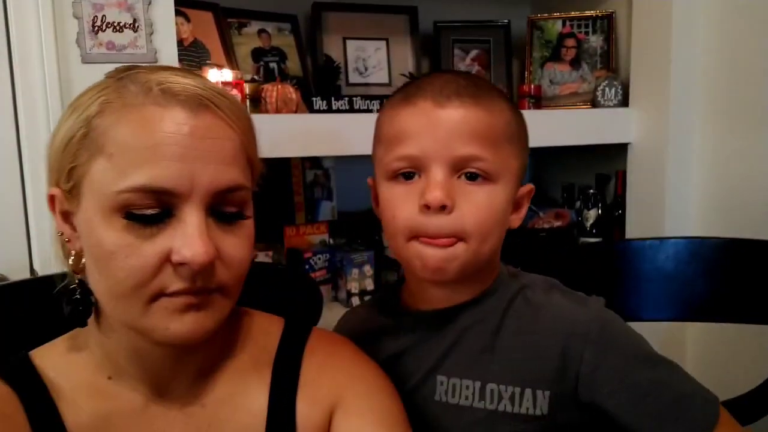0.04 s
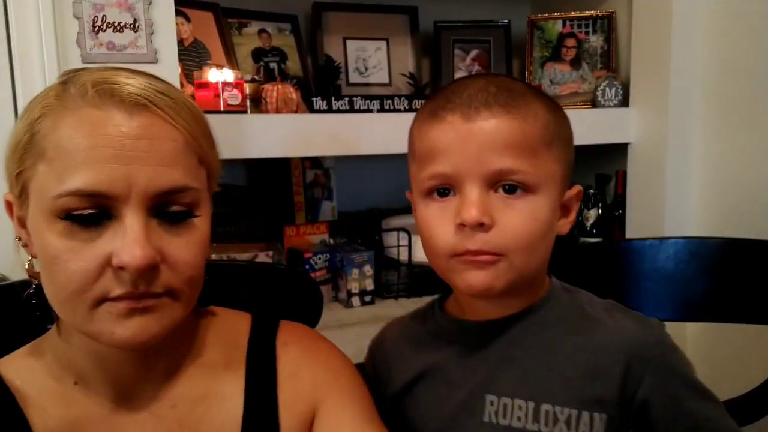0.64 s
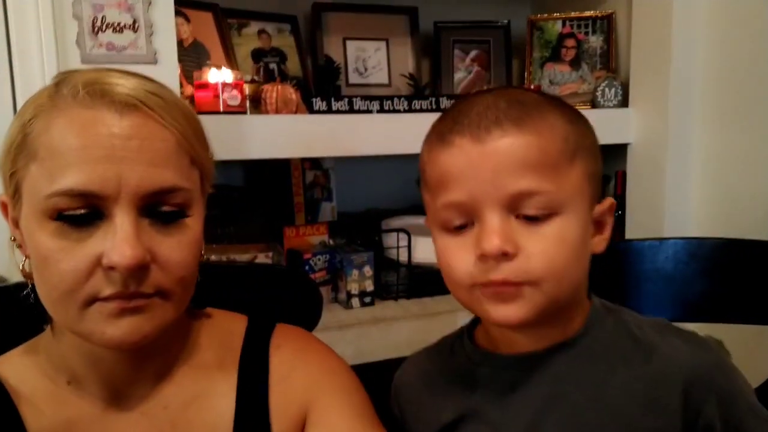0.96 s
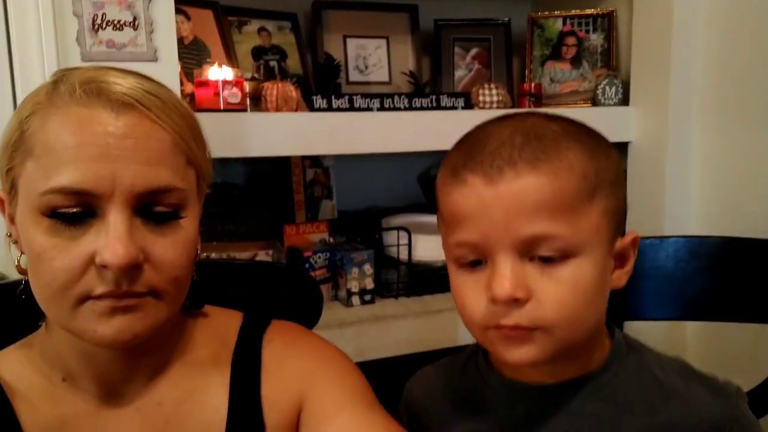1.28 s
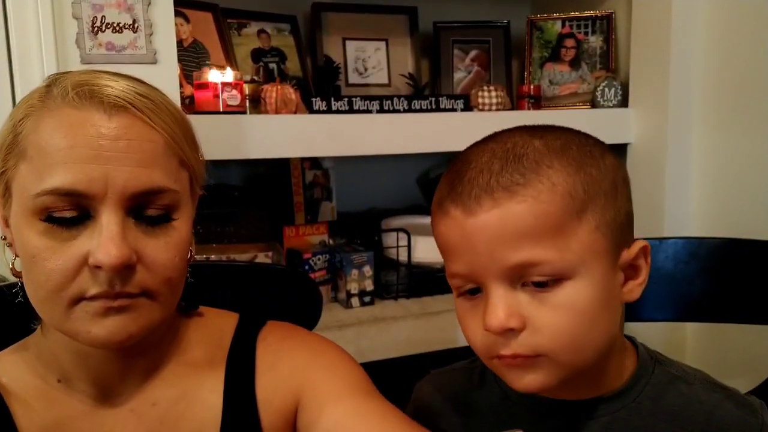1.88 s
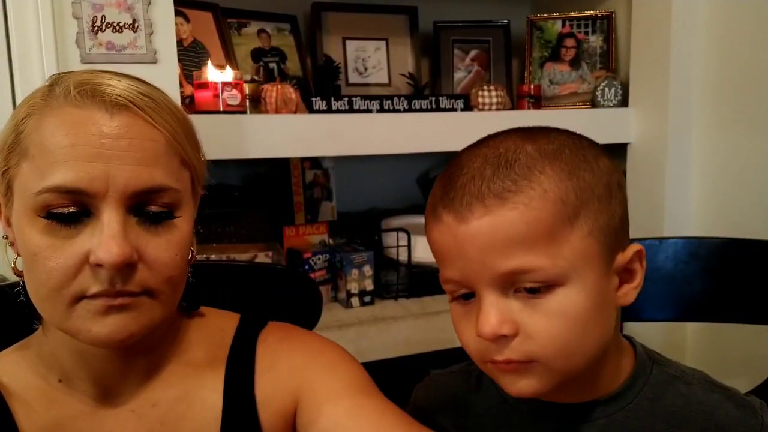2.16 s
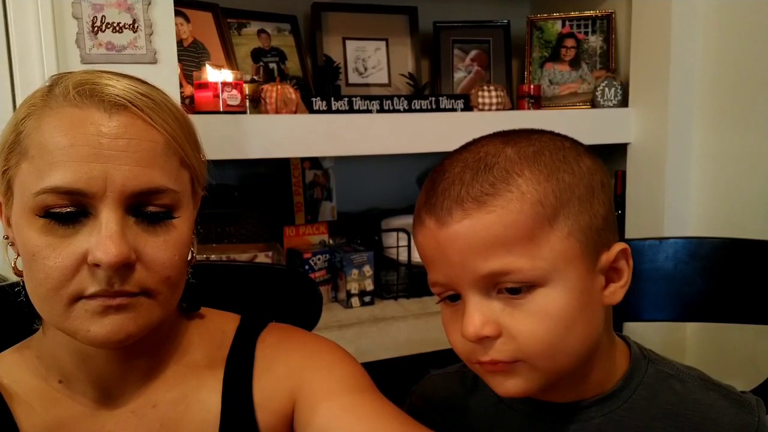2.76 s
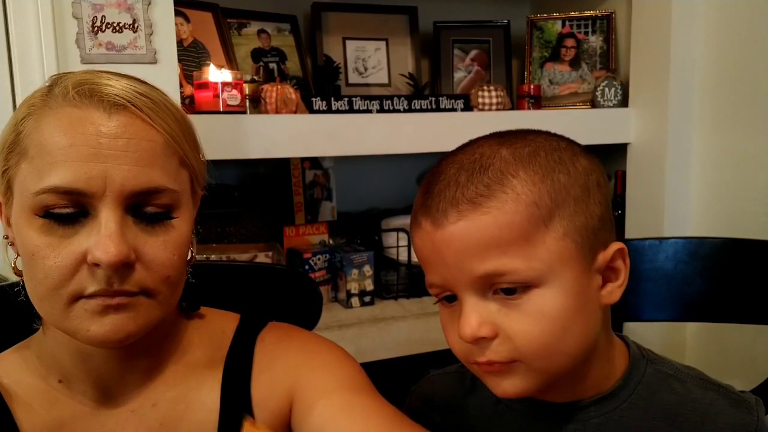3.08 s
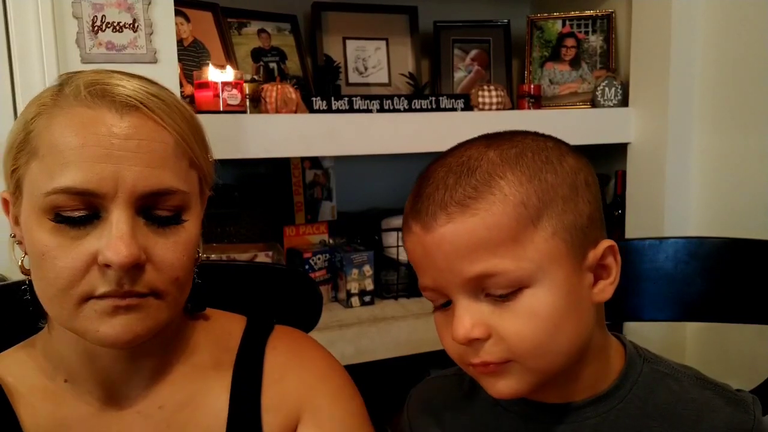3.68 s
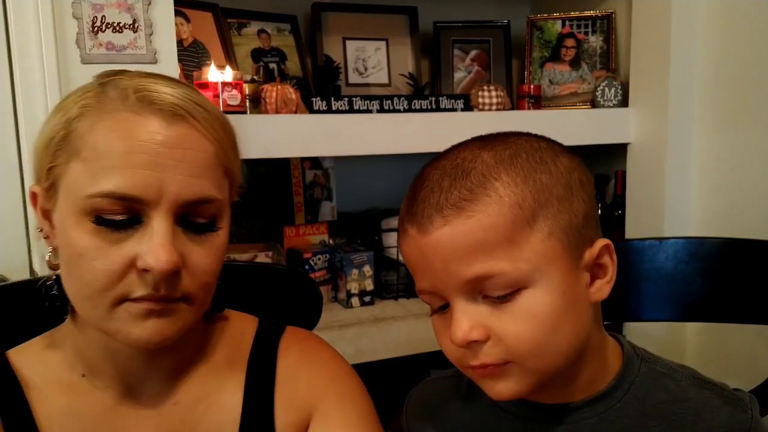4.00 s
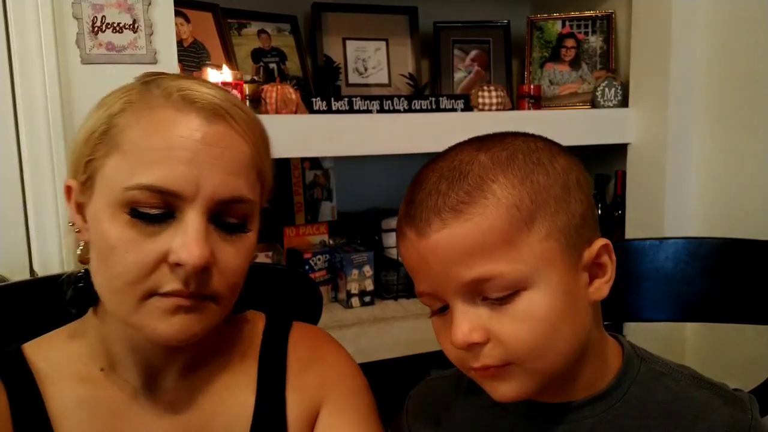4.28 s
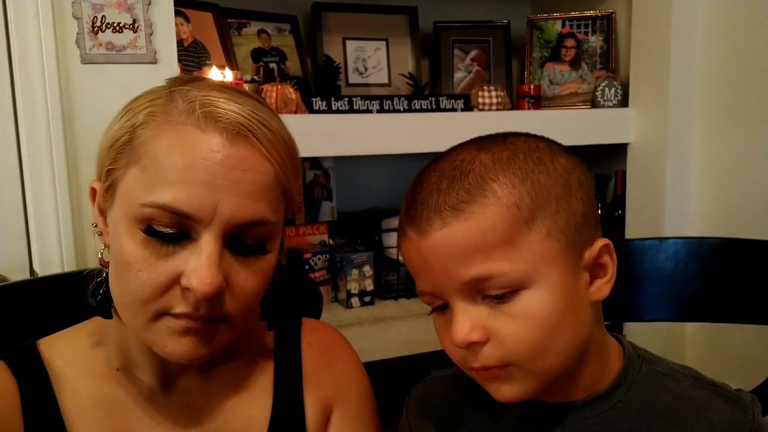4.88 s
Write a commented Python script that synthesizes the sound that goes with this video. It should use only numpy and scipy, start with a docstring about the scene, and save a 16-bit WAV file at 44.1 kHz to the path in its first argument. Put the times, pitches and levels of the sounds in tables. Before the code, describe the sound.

A thin plastic snack bag crinkles and snaps irregularly in a quiet room, and near the end something knocks down onto a table.

```python
"""Living room: a thin plastic snack bag is handled. Creases buckle and snap one by one, the film
resettles after each, and squeezes crush small wrinkles and ring the bag's panels. Near the end an
object is set on a table with a few knocks, a scrape and light taps, and the bag gives its loudest
crack. The room answers briefly; an appliance hums faintly."""
import sys
import numpy as np
from scipy import signal
from scipy.fft import rfft, irfft, next_fast_len
from scipy.io import wavfile
from scipy.ndimage import uniform_filter1d, map_coordinates

SR = 44100
rng = np.random.default_rng(int(sys.argv[2]) if len(sys.argv) > 2 else 0)


def file_out(sig):
    """Save sig as 16-bit WAV at sys.argv[1]."""
    # one column per channel
    cols = np.atleast_2d(sig).T
    # limit, then scale
    lim = np.clip(cols, -1, 1)
    pcm = np.round(lim * 32767).astype(np.int16)
    wavfile.write(sys.argv[1], SR, pcm)


N = 222308
BAND_LIMIT_HZ = 7950

# Large creases: t/s, level/dB, mid/dB, low/dB, resettling/dB (last three re level)
CREASE_SNAPS = [(0.0173, -31, -2.5, -19, -24), (0.1006, -25, -19, -23, -13), (0.117, -33.5, -4, -3.5, -17),
                (0.1351, -24.5, -9, -8.5, -20.5), (0.142, -29.5, -4, -5, -16), (0.161, -34, -11, -7, -14),
                (0.3683, -25, 6, -8, -19), (0.376, -29, 0, -13, -18), (0.4399, -34, -16, -36, -12),
                (0.4805, -40.5, -7, -10.5, -11.5), (0.5664, -35, -25, -17, -12),
                (0.6481, -35, -11, -7.5, -20.5), (0.6971, -31, -6.5, -11, -17),
                (0.7819, -37.5, -8, -23, -11), (0.8995, -34.5, -27, -15.5, -9.5),
                (1.035, -39.5, -3, 0, -15.5), (1.156, -41.5, -2, -18, -15), (1.1707, -32.5, -14, -13, -16),
                (1.3113, -45.5, -30, -16, -12), (1.3715, -37, -9.5, -16, -15),
                (1.544, -46.5, -5.5, -7, -24), (1.6653, -31, -12.5, -20, -15),
                (1.7401, -34, -26, -17, -13.5), (1.7734, -36.5, -30, -11, -15),
                (1.8509, -28, -12, -27, -24), (1.947, -35.5, -11, -21.5, -13),
                (2.0009, -31, -15, -12.5, -18.5), (2.0969, -34.5, 0, -3, -22.5),
                (2.1683, -27.5, -20.5, -27, -17), (2.2587, -33, -13.5, -9.5, -23),
                (2.283, -38, -6, -16.5, -20.5), (2.2974, -37, -18, -19, -16.5),
                (2.3137, -34, -18, -21, -19), (2.333, -38, -2, -22, -19.5), (2.362, -31, -14, -18, -20),
                (2.389, -28.5, -14, -13, -19), (2.422, -32.5, -13, -12.5, -19),
                (2.4602, -31, -16, -13, -22), (2.5245, -27.5, -15, -13, -15),
                (2.5533, -38, -10, -10, -12.5), (2.5945, -27.5, -8.5, -54, -10.5),
                (2.657, -32, -20, -13.5, -13.5), (2.692, -33, -29, -9.5, -22.5),
                (2.7139, -37.5, -6, -6, -7), (2.724, -33, -9.5, -5, -14.5), (2.745, -35.5, -19, -17, -16.5),
                (2.7617, -22.5, -13, -18, -20), (2.8576, -40, -21, -31, -14), (2.894, -43, -15, -23, -20),
                (2.9282, -28, -7.5, -18, -19.5), (2.9741, -23.5, -7, -20, -13.5),
                (3.003, -29.5, -12, -6.5, -18), (3.0195, -14.5, -12, -21.5, -20.5),
                (3.0931, -26, -12.5, -16, -16.5), (3.135, -38.5, -20.5, -16, -20.5),
                (3.1534, -35.5, -20, -34, -17.5), (3.1744, -34.5, -2, -17, -15),
                (3.2522, -27.5, -27, -28, -18.5), (3.264, -18.5, -14, -14.5, -15.5),
                (3.279, -29.5, -11, -17, -17), (3.346, -33.5, -25.5, -25, -17.5),
                (3.3688, -25.5, -18, -11, -21), (3.4823, -40, -3, 1.5, -21), (3.612, -34.5, -3, -11, -18.5),
                (3.616, -21.5, -4, -12.5, -17), (3.655, -29.5, -10, -5, -18.5),
                (3.6677, -32.5, -1, -4, -15), (3.680, -29, -4, -2.5, -18.5), (3.6845, -28.5, -1, -5.5, -19),
                (3.8589, -42, -20, -9.5, -10), (3.9844, -27.5, -17, -26, -16), (4.277, -32.5, 2, 3, -19),
                (4.425, -20, -16, -4.5, -21), (4.435, -31.5, -7, 4.5, -21.5), (4.464, -30, -6, 4, -22),
                (4.5357, -28.5, 3.5, 0.5, -16.5), (4.5647, -31, -11, 0, -20), (4.5975, -41, -2, 4, -18),
                (4.6452, -25.5, -5, -9, -27), (4.6837, -16.5, -9, -3, -28), (4.6868, -17, 1, -2.5, -24),
                (4.701, -24, -4, -0.5, -13), (4.724, -31.5, -10, 1.5, -17.5),
                (4.7634, -12.5, -3.5, -5.5, -30), (4.8045, -18.5, -15.5, -12, -22),
                (4.8764, -24.5, -15.5, -13, -21.5), (4.896, -35, -28, -3.5, -18.5),
                (4.9245, -34.5, -14, -0.5, -20), (5.0294, -36, -1.5, 0, -17.5)]


def snaps(gain_db=11.5, mid_db=3, low_db=6, crackles_per_s=70, crackle_db=6):
    """Large creases buckle one by one; squeezes set off small ones at random."""
    creases = [(s, db, mid + mid_db, low + low_db) for s, db, mid, low, _ in CREASE_SNAPS]
    for s, length, db, _ in FINGER_SQUEEZES:
        draws = rng.random((20, 2))[:int(crackles_per_s * length)]
        for when, weakness in draws:
            creases.append((s + when * length, db + crackle_db - 10 * weakness, 2, -16))
    out = np.zeros(N + SR)
    for s, db, mid, low in creases:
        crack = snap(db + gain_db, mid, low)
        start = SR // 2 + round(s * SR) - len(crack) // 2
        out[start:start + len(crack)] += crack
    return out[SR // 2:][:N]


# Crease spectrum: f/Hz, level/dB
CREASE_SPECTRUM = [(100, -34.5), (400, -7.5), (800, 0.5), (1400, 4), (2400, 4), (3500, 8.5), (5000, 3),
                   (6500, 7.5), (7500, -4)]


def snap(db, mid_db, low_db, flutter_db=-23, flutter_t60_s=0.02, lag_s=0.002, uneven_db=3, size=2048):
    """A crease flips in a jolt and a weaker second one, then the film flutters; no two ring alike."""
    t, hz = np.arange(size) / SR, np.fft.rfftfreq(size, 1 / SR)
    jolt = amp(flutter_db - 60 * t / flutter_t60_s) * rng.standard_normal(size)
    jolt[0] += 1
    second_jolt = rng.uniform(-0.28, 1) * np.exp(-2j * np.pi * hz * lag_s * rng.uniform(0.51, 1))
    panel_db = along([(1700, low_db), (3600, mid_db), (6500, 0.0077)], hz)  # larger panels sound lower
    own_db = uneven_db * map_coordinates(rng.standard_normal(16), [15 * hz / BAND_LIMIT_HZ], mode='nearest')
    colour = amp(along(CREASE_SPECTRUM, hz) + panel_db + own_db) * (hz < BAND_LIMIT_HZ + 1000)
    spectrum = rfft(jolt) * (1 + second_jolt) * colour * bending(hz, travel_s=0.0011)
    crack = np.fft.fftshift(irfft(spectrum))
    return amp(db) * crack / np.linalg.norm(crack)


# Small wrinkles: f/Hz, density/dB
FILM_SPECTRUM = [(400, -58), (1000, -42.5), (1800, -22), (2800, 0.5), (4000, -2), (5200, 3.5), (6300, 4),
                 (7400, 9), (8200, -10.5)]
# Whole panels and enclosed air: f/Hz, density/dB
HOLLOW_SPECTRUM = [(70, -20), (130, -8), (220, -9), (320, -1), (440, -5), (570, 1), (700, -6), (820, 3),
                   (1060, -5), (1210, 3), (1350, -6), (1620, 2), (1850, -1), (2200, 1), (4000, -10),
                   (8000, -35)]


def crinkle(film_db=-3.5, hollow_db=-2, busy_db=-45, surge_db=2):
    """Fingers crush wrinkles and flex panels; more force buckles more wrinkles a second."""
    fine_db, body_db = strain()
    per_s = 1000 * amp((fine_db - busy_db) / 2)
    fine = patchy(wrinkles(FILM_SPECTRUM, per_s, spread_db=-1), depth_db=3.5)
    body = patchy(wrinkles(HOLLOW_SPECTRUM, per_s=1200, spread_db=3), depth_db=4)
    surge = amp(surge_db * wobble(70))  # one buckle sets off its neighbours
    return (amp(fine_db + film_db) * fine + amp(body_db + hollow_db) * body) * surge


# Squeezes: t/s, length/s, level/dB, hollow rustle/dB (re level)
FINGER_SQUEEZES = [(0.0, 0.0032, -43, -7.5), (0.123, 0.032, -42.5, -10.5), (0.274, 0.07, -53, -8),
                   (0.357, 0.03, -45, -10.5), (0.695, 0.26, -56, -8.5), (1.003, 0.033, -49.5, -7.5),
                   (1.392, 0.11, -64, -5.5), (2.112, .22, -54, -14.5), (2.385, 0.032, -46, -12),
                   (2.52, 0.073, -48, -12), (2.623, 0.031, -42, -14.5), (2.705, 0.032, -44.5, -13),
                   (2.79, 0.043, -44.5, -36), (2.863, 0.06, -37.5, -52), (2.935, 0.031, -33.5, -7.5),
                   (2.97, 0.028, -36, -3), (3.079, 0.12, -45.5, -35), (3.185, 0.041, -43.5, -8.5),
                   (3.262, 0.0084, -32.5, -9.5), (3.296, 0.054, -42, -15.5), (3.424, 0.18, -60, -2.5),
                   (3.601, 0.023, -44, -7.5), (3.652, 0.01825, -43, 0), (4.457, .18, -63, 13),
                   (4.694, 0.037, -44, -5), (4.781, 0.035, -54.5, 8)]


def strain(held_db=-73.5, attack_s=0.014, swell_db=2.5, release_db_per_s=251.5,
           load_db=-23.5, load_db_per_s=806.5, settle_db_per_s=254):
    """Drive in dB on wrinkles and panels: holding, squeezing, loading and resettling at each snap."""
    t = np.arange(N) / SR
    fine, body = np.full(N, amp(held_db) ** 2), np.full(N, amp(held_db - 2) ** 2)
    around = lambda s: slice(max(int(s * SR) - SR // 8, 0), int(s * SR) + SR // 2)
    for s, length, db, hollow_db in FINGER_SQUEEZES:
        since = t[around(s)] - s
        grip = np.clip(since / attack_s + 1, 0, 1)
        tighten_db = swell_db * (np.clip(since / length, 0, 1) - 0.5)
        release_db = release_db_per_s * np.maximum(since - length, 0)
        power = (grip * amp(db + tighten_db - release_db)) ** 2
        fine[around(s)] += power
        body[around(s)] += power * amp(hollow_db) ** 2
    for s, db, _, low_db, settle_db in CREASE_SNAPS:
        since = t[around(s)] - s
        creak_db = load_db + load_db_per_s * since
        fade_db = settle_db - settle_db_per_s * since
        power = amp(db + np.where(since < 0, creak_db, fade_db)) ** 2
        fine[around(s)] += power
        body[around(s)] += power * amp(low_db + 1) ** 2
    return 10 * np.log10([fine, body])


def wrinkles(spectrum, per_s, spread_db, travel_s=0.0006157, t60_s=0.015, patches=3):
    """Tiny buckles of random time and size, from patches at different distances."""
    out, t = np.zeros(N), np.arange(SR // 50) / SR
    decay = amp(-60 * t / t60_s) ** 2
    for _ in range(patches):
        sizes = amp(spread_db * np.clip(rng.standard_normal(N), -2, 2))
        power = sizes ** 2 * (rng.random(N) < per_s / patches / SR) / per_s
        flutter = np.sqrt(np.abs(signal.fftconvolve(power, decay)[:N])) * rng.standard_normal(N)
        delay_s = travel_s * rng.uniform(0.47, 1.9805)
        out += filtered(flutter, lambda hz: amp(along(spectrum, hz)) * bending(hz, delay_s))
    return unit(out)


def bending(hz, travel_s):
    """Bending waves in film: highs arrive first; travel_s is the delay at 6 kHz."""
    return np.exp(-4j * np.pi * travel_s * np.sqrt(6000 * hz))


def patchy(x, depth_db, size=512):
    """Panels change shape as they bend, so resonances come and go."""
    frames = signal.stft(x, nperseg=size)[2]
    field = uniform_filter1d(rng.standard_normal(frames.shape), size=3, axis=0)
    field = unit(uniform_filter1d(field, size=7, axis=1))
    return unit(signal.istft(frames * amp(depth_db * field), nperseg=size)[1][:N])


# Stretched bag panels: f/Hz, width/Hz, level/dB
PANEL_MODES = [(822, 20, -5.5), (1199, 17, -7.5), (1586, 51, 0), (1920, 23, 1.5), (2306, 75, -3),
               (2850, 96, -6), (3770, 110, -2.5)]


def panels(film, gain_db=-3, stretch=0.068, shapes_per_s=14, shapes=5):
    """Buckles ring the panels; pitches shift as the fingers reshape the bag."""
    out, shape = np.zeros(N), np.floor(np.arange(N) / SR * shapes_per_s) % shapes
    for k in range(shapes):
        modes = [(hz * np.exp(stretch * rng.standard_normal()), width, db) for hz, width, db in PANEL_MODES]
        response = lambda f: sum((-1) ** i * amp(db) * 1j * f * width / (hz * hz - f * f + 1j * f * width)
                                 for i, (hz, width, db) in enumerate(modes))
        out += filtered(film * soft_gate(shape == k), response)
    return amp(gain_db) * out


# Object on table: t/s, level/dB, low-pass f/Hz
TABLE_KNOCKS = [(4.216, -32.5, 995), (4.244, -29.5, 400), (4.287, -23, 855), (4.301, -19, 297),
                (4.311, -19, 1820), (4.316, -20, 1580), (4.333, -24, 914), (4.352, -14, 446),
                (4.367, -19, 794), (4.381, -17.5, 403), (4.399, -16.5, 498)]
# Loaded table: f/Hz, level/dB, t60/s
TABLE_MODES = [(140, -13, .4), (203, 1, .25), (219, -9, .15), (247, -1.5, .25), (275, -5, .2),
               (305, -14, .12), (335, -4.5, .24), (365, -13, .14), (438, -8, .24), (478, -14, .14),
               (522, -14, .16), (641, -13, .2), (712, -16, .2), (927, 0, .19), (964, 0, .19),
               (1104, -7, .1), (1246, -6, .11), (1460, -9, .08), (1680, -10, .1)]


def knocks(gain_db=-14, clack_db=12, clack_t60_s=0.019, rattle_db=2, rattle_hz=1900,
           rest_s=4.405, rest_db_per_s=139):
    """An object lands, rocks and settles; harder contacts reach higher modes and rattle loose parts."""
    out, t = np.zeros(N), np.arange(SR * 3 // 4) / SR
    for s, db, dull_hz in TABLE_KNOCKS:
        clack = amp(clack_db - 60 * t / clack_t60_s) * rng.standard_normal(len(t))
        rattle = amp(rattle_db) * butter(clack, [rattle_hz / np.sqrt(2), rattle_hz * np.sqrt(2)], 'band')
        blow = ringing(TABLE_MODES, t) + clack + rattle
        add(out, s, amp(db + gain_db) * butter(blow, dull_hz, 'low'))
    out *= amp(-rest_db_per_s * np.clip(np.arange(N) / SR - rest_s, 0, 1))  # resting object damps the top
    return butter(out, 150, 'high')  # the knocks carry little bass below 150 Hz


# Drag between knocks: t/s, level/dB
SCRAPE_LEVELS = [(4.212, -80), (4.217, -52), (4.27, -59.5), (4.3, -48), (4.325, -38.5), (4.4, -41),
                 (4.45, -48.5), (4.52, -57), (4.56, -110)]
# Base on table top: f/Hz, density/dB
SCRAPE_SPECTRUM = [(100, -40.5), (250, -10.5), (500, 1), (750, -3), (1100, -1), (1500, -4.5), (2400, -8.5),
                   (2900, -9), (3500, -31.5), (7000, -50.5)]


def scrape(gain_db=-1, rough_db=3.5):
    """The object's base catches and slips in tiny irregular jerks."""
    slips = wrinkles(SCRAPE_SPECTRUM, per_s=940, spread_db=4, t60_s=0.01)
    return amp(curve(SCRAPE_LEVELS) + gain_db) * unit(slips * amp(rough_db * wobble(120)))


# Light taps: t/s, level/dB, pitch ratio
LIGHT_TAPS = [(4.425, -24.5, 0.986), (4.465, -30, 0.72), (4.473, -34.5, 0.73), (4.636, -28.5, 1.02),
              (4.683, -24.5, 0.97)]
# Tap ring: f/Hz, level/dB, t60/s
TAP_MODES = [(1393, -13.5, 0.033), (1627, -18, 0.035), (1860, 6.5, 0.01), (1896, 4, 0.018),
             (2420, 3.5, 0.01)]


def taps():
    """Something small and hard taps and rings briefly."""
    return short_rings(LIGHT_TAPS, TAP_MODES, gain_db=-1.5, attack_s=0.00055)


# Low blips: t/s, level/dB, pitch ratio
LOW_BLIPS = [(1.009, -45.5, 0.96), (1.171, -57, 0.8), (2.632, -50, 0.85), (3.003, -45, 0.772),
             (3.275, -54, 0.77), (3.366, -53.5, 0.886), (3.678, -57, 0.9)]
# Blip tones: f/Hz, level/dB, t60/s
BLIP_MODES = [(375, -4.5, 0.097), (455, -8.5, 0.092), (920, -1.5, 0.042), (1150, 1.5, 0.04)]


def blips():
    """Short, dull, hollow low blips within the rustle."""
    return short_rings(LOW_BLIPS, BLIP_MODES, gain_db=4.5, attack_s=0.0022)


def short_rings(rows, modes, gain_db, attack_s):
    """One brief ring of the modes per row, with a rounded onset."""
    out, t = np.zeros(N), np.arange(SR // 4) / SR
    for s, db, pitch in rows:
        add(out, s, amp(db + gain_db) * ringing(modes, t, pitch) * (1 - np.exp(-t / attack_s)))
    return out


def ringing(modes, t, pitch=1, scatter_db=0):
    """Damped modes with random signs."""
    hz, db, t60_s = np.transpose(modes)[:, :, None]
    strength = amp(db + scatter_db * rng.standard_normal(hz.shape)) * rng.choice([-1, 1], hz.shape)
    return np.sum(strength * amp(-60 * t / t60_s) * np.sin(2 * np.pi * hz * pitch * t), axis=0)


# Room decay: f/Hz, t60/s
ROOM_T60 = [(150, 0.41), (1000, 0.53), (4000, 0.67), (8000, 0.37)]


def room(x, tail_db, early_db, early_t60_s=0.0551, gap_s=0.0052, positions=4, moves_per_s=10):
    """Early reflections, then a diffuse tail; the paths change as the bag moves."""
    out, position = np.zeros(N), np.floor(np.arange(N) / SR * moves_per_s) % positions
    for k in range(positions):
        hz, t, noise = signal.stft(rng.standard_normal(SR * 3 // 4), SR, nperseg=256)
        tail = signal.istft(noise * amp(-60 * t / along(ROOM_T60, hz)[:, None]), SR, nperseg=256)[1]
        t = np.arange(len(tail)) / SR
        early = rng.standard_normal(len(t)) * amp(-60 * t / early_t60_s)
        response = sum(amp(db) * part * (t > gap_s) / np.linalg.norm(part * (t > gap_s))
                       for part, db in [(tail, tail_db), (early, early_db)])
        out += signal.fftconvolve(x * soft_gate(position == k), response)[:N]
    return out


# Still room: f/Hz, density/dB
AIR_SPECTRUM = [(25, -18.5), (45, 10.5), (65, -2), (100, 8.5), (200, 6.5), (500, 4.5), (800, 0.5),
                (1300, -6.5), (2000, -28.5), (4000, -8), (7000, -13)]


def air(rms_db=-64):
    """Steady, mostly low noise of the still room."""
    return amp(rms_db) * unit(filtered(rng.standard_normal(N), lambda hz: amp(along(AIR_SPECTRUM, hz))))


# Appliance tones: f/Hz, level/dB
HUM_TONES = [(59, -79.5), (76, -70), (172.3, -78), (242.2, -84.5), (436, -78.5)]
# Main tone, fading and returning: t/s, level/dB
DRONE_LEVELS = [(0, -65), (1.2, -72.5), (2.5, -76.5), (5, -72.5)]


def appliance(drone_hz=135, waver_db=3.5):
    """A hum whose tones waver in level and phase."""
    out, t = np.zeros(N), np.arange(N) / SR
    for hz, db in [*HUM_TONES, (drone_hz, curve(DRONE_LEVELS))]:
        peak = np.sqrt(2) * amp(db + waver_db * wobble(5.8))
        out += peak * np.sin(2 * np.pi * hz * t + 0.5 * wobble(1.5))
    return out


def amp(db):
    """dB to gain."""
    return 10 ** (np.asarray(db) / 20)


def unit(x):
    """Scale to rms 1."""
    return x / np.sqrt(np.mean(x ** 2) + 1e-20)


def along(points, hz):
    """Interpolate (f/Hz, value) on a log axis."""
    f, values = np.transpose(points)
    return np.interp(np.log(hz + 1), np.log(f + 1), values)


def curve(points):
    """Interpolate (t/s, value) per sample."""
    return np.interp(np.arange(N) / SR, *np.transpose(points))


def wobble(knots_per_s):
    """Smooth random curve."""
    knots = rng.standard_normal(int(N * knots_per_s / SR) + 4)
    return map_coordinates(knots, [np.arange(N) * knots_per_s / SR])


def soft_gate(on):
    """On/off mask with 12 ms ramps."""
    return uniform_filter1d(1.0 * on, size=512)


def filtered(x, response):
    """Apply a complex frequency response."""
    size = next_fast_len(N + SR // 2)
    return irfft(rfft(x, size) * response(np.fft.rfftfreq(size, 1 / SR)), size)[:N]


def butter(x, hz, kind):
    """Filter with 12 dB/octave slopes."""
    return signal.sosfilt(signal.butter(2, hz, kind, fs=SR, output='sos'), x)


def add(track, s, sound):
    """Mix in at time s."""
    start = int(np.clip(round(s * SR), 0, N))
    track[start:start + len(sound)] += sound[:N - start]


def suppress(x, above_db=15, quiet_db=-53, knee_db=4, depth_db=22, edge_hz=1000, size=1024):
    """A noise suppressor shuts the low band while it is quiet and far below the treble."""
    hz, _, frames = signal.stft(x, SR, nperseg=size)
    power = np.abs(uniform_filter1d(np.abs(frames) ** 2, size=5, axis=1)) + 1e-20
    treble_db = 10 * np.log10(power[hz > 4000].sum(0))
    low_db = 10 * np.log10(power[(hz > 200) & (hz < 1000)].sum(0))
    shut = np.clip(np.minimum(treble_db - low_db - above_db, quiet_db - low_db) / knee_db, 0, 1)
    low_band = 1 / (1 + (hz[:, None] / edge_hz) ** 6)
    return signal.istft(frames * amp(-depth_db * shut * low_band), SR, nperseg=size)[1][:N]


def scene():
    """Bag, table, taps and blips in the room, over air and hum."""
    film = snaps() + crinkle()
    table = knocks() + scrape()
    bag = film + panels(film)
    small = taps() + blips()
    reverb = room(bag + small, tail_db=-14.5, early_db=-12) + room(table, tail_db=-10, early_db=-14)
    return (bag + small + table + reverb + air() + appliance())[None]


def record(dry, low_cut_hz=45):
    """Microphone channel: low cut, noise suppressor, steep band limit."""
    clean = suppress(butter(dry[0], low_cut_hz, 'high'))
    return filtered(clean, lambda hz: 1 / np.sqrt(1 + (hz / BAND_LIMIT_HZ) ** 76))[None]


dry = scene()
out = record(dry)
file_out(out)
```